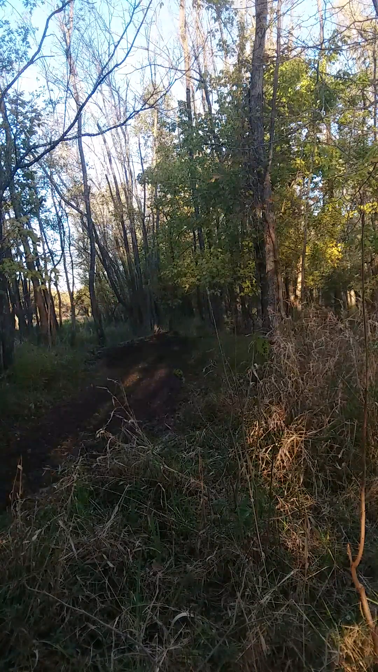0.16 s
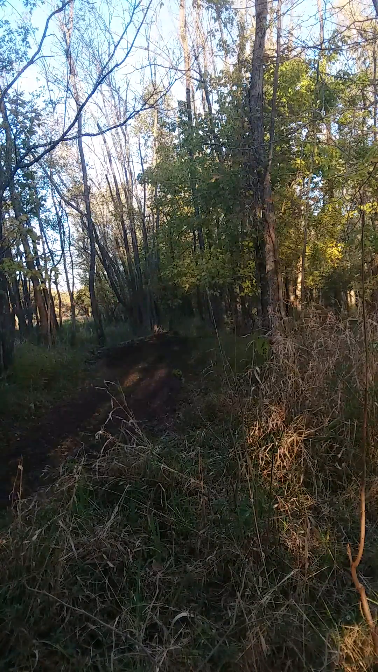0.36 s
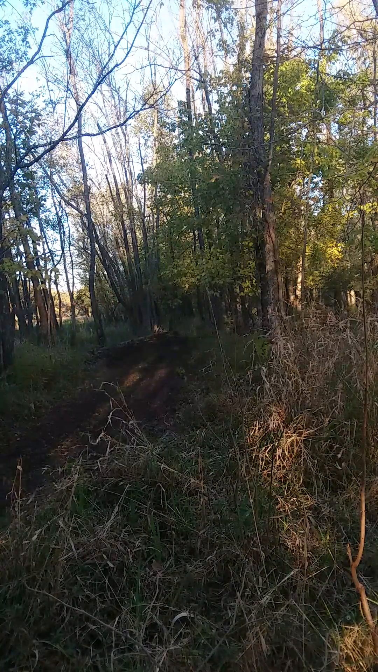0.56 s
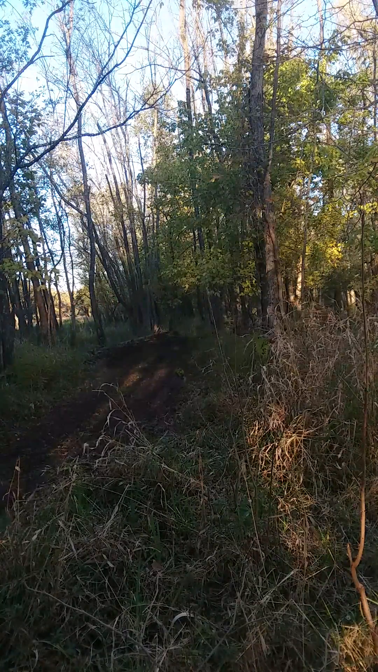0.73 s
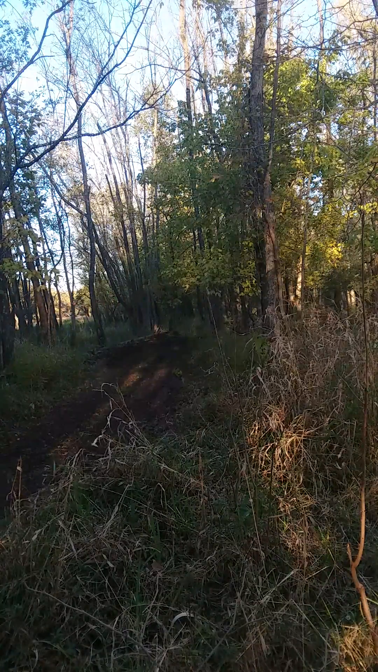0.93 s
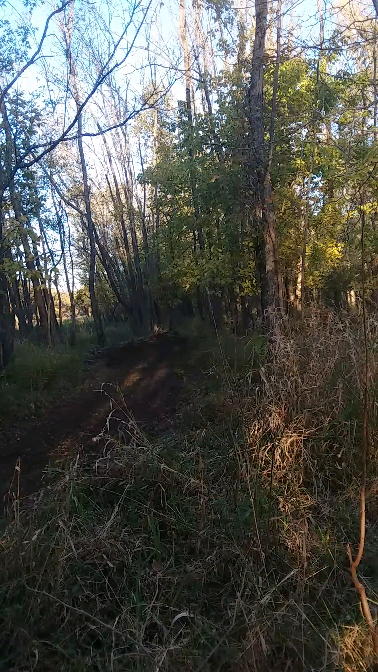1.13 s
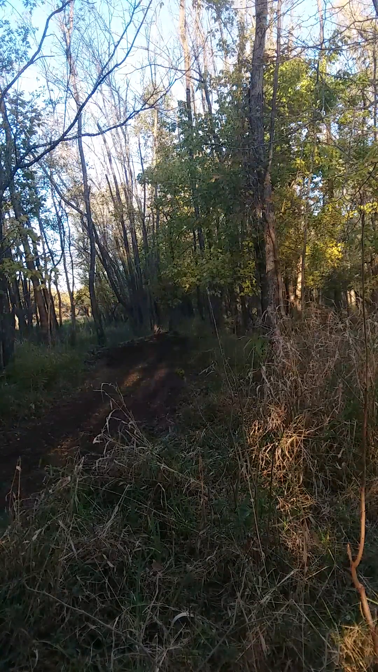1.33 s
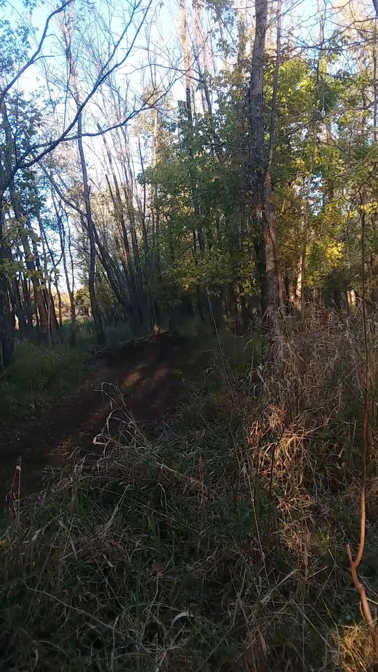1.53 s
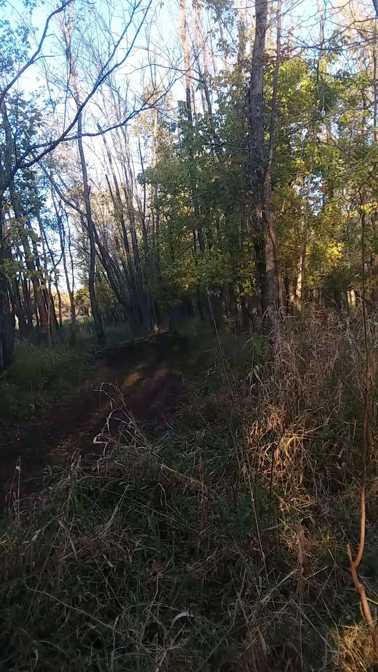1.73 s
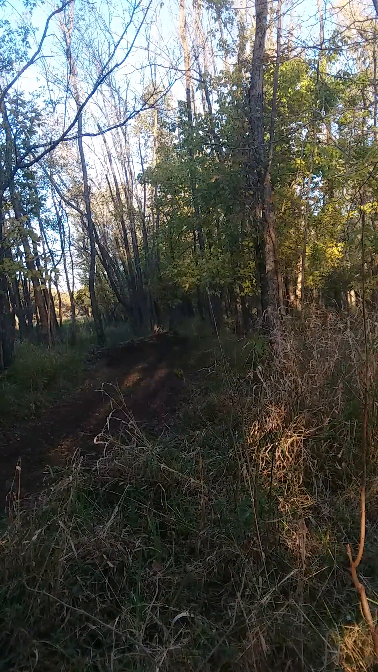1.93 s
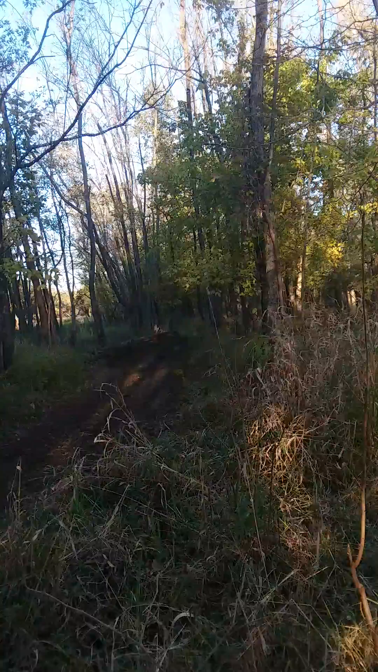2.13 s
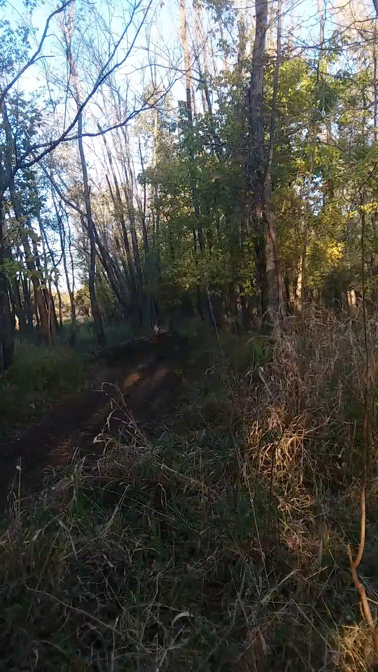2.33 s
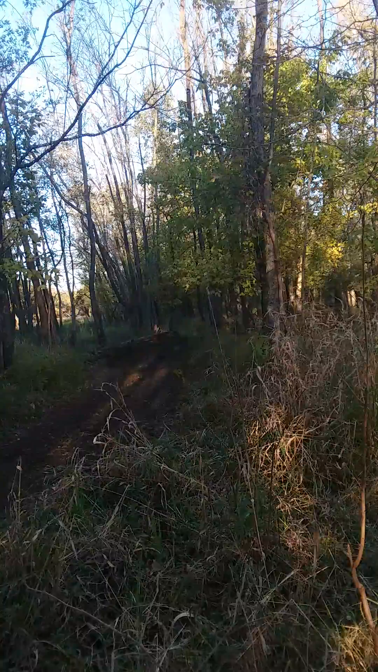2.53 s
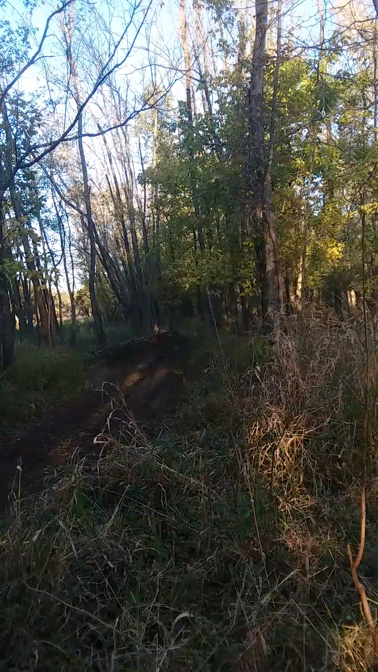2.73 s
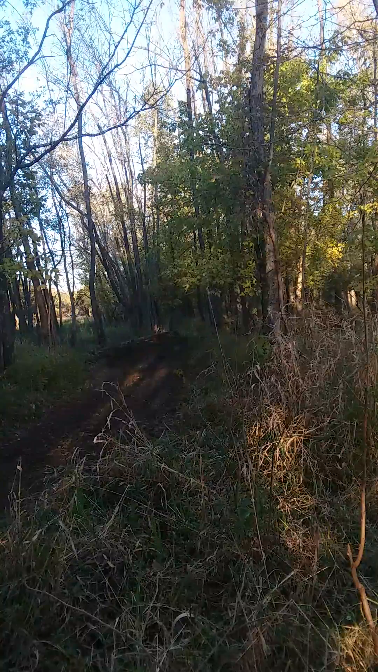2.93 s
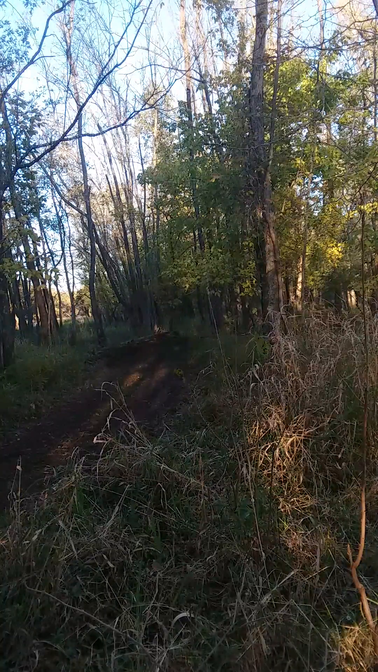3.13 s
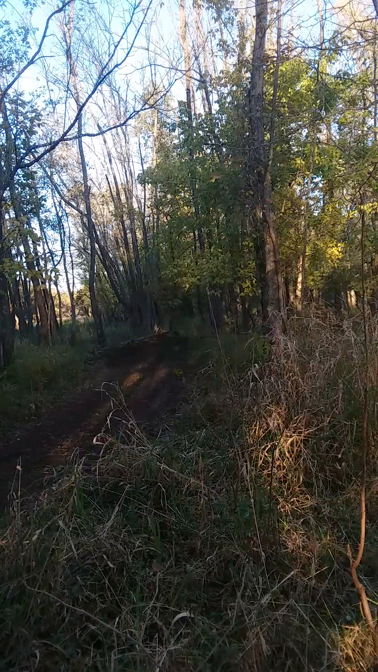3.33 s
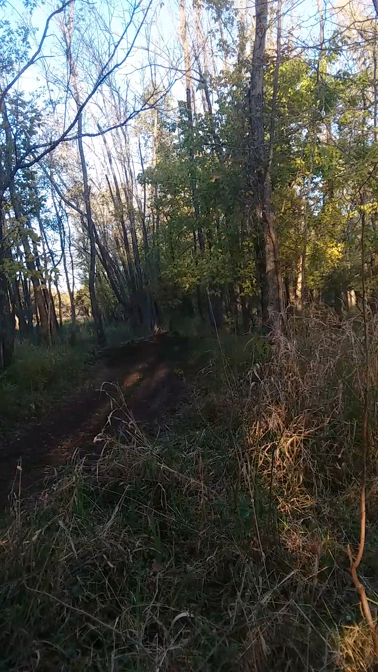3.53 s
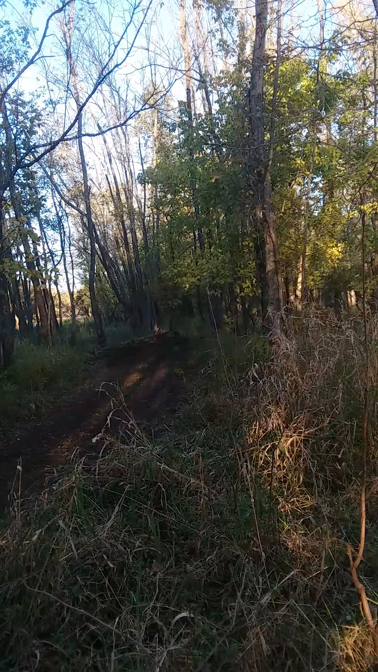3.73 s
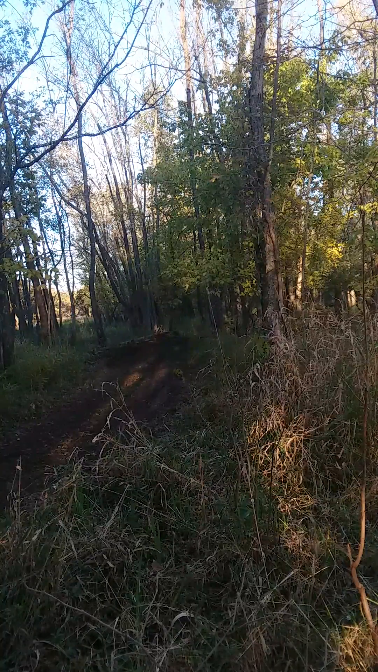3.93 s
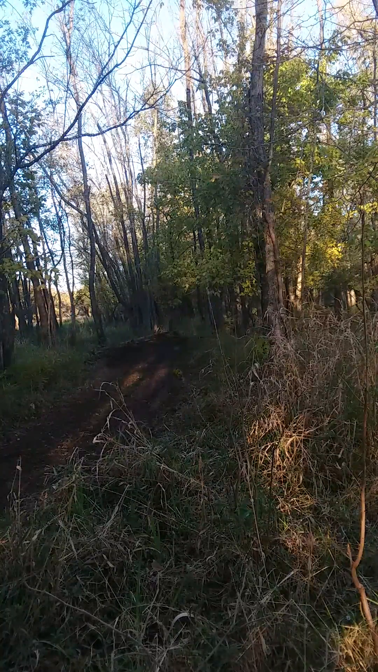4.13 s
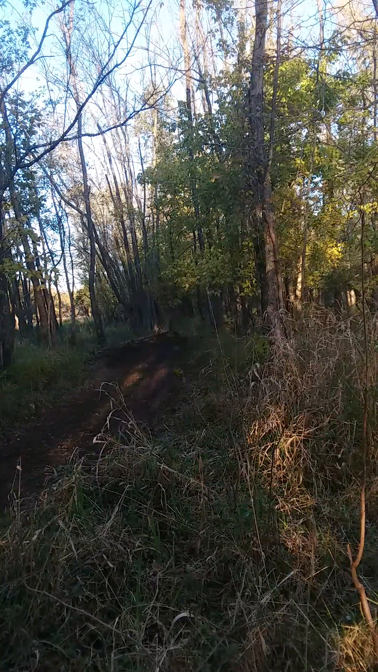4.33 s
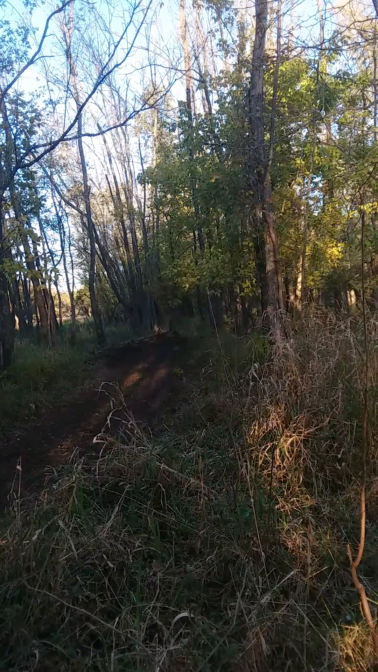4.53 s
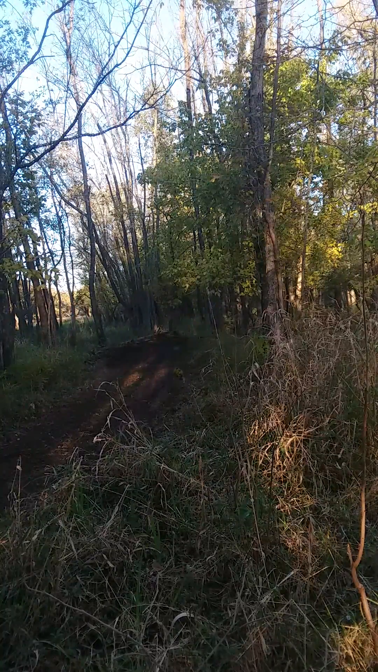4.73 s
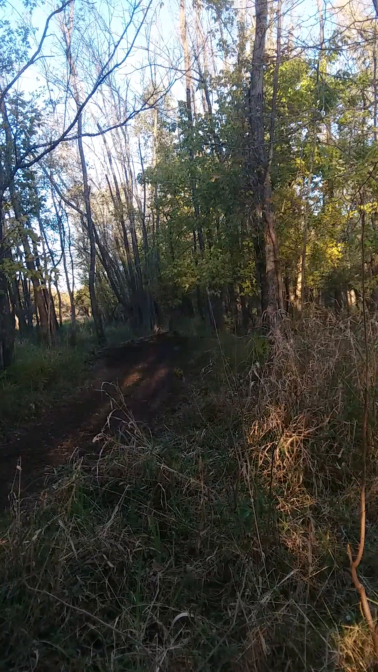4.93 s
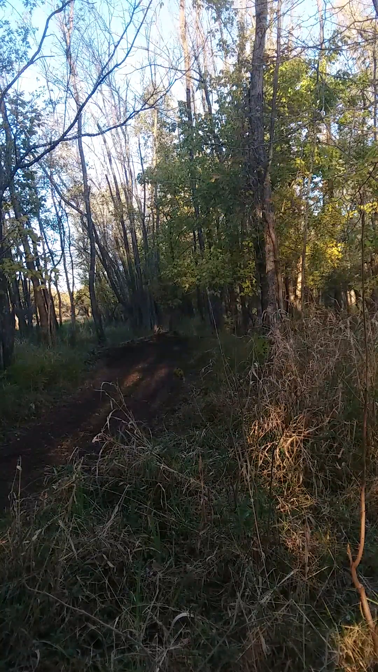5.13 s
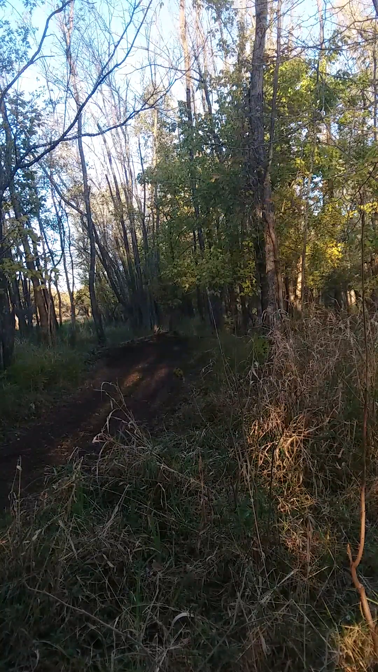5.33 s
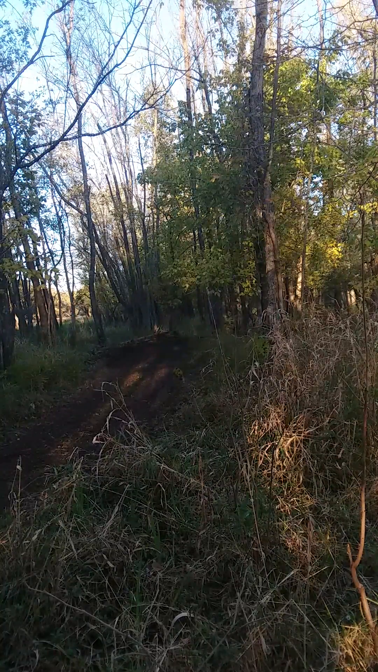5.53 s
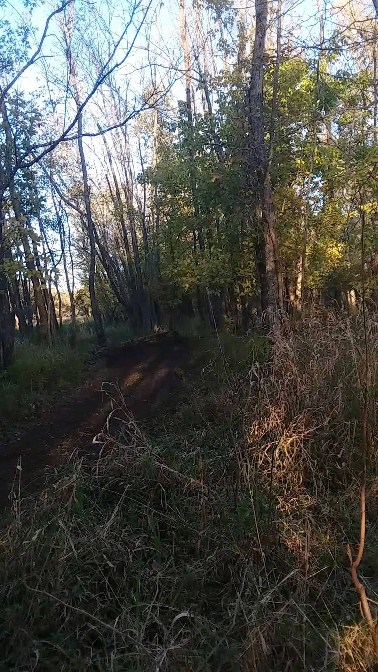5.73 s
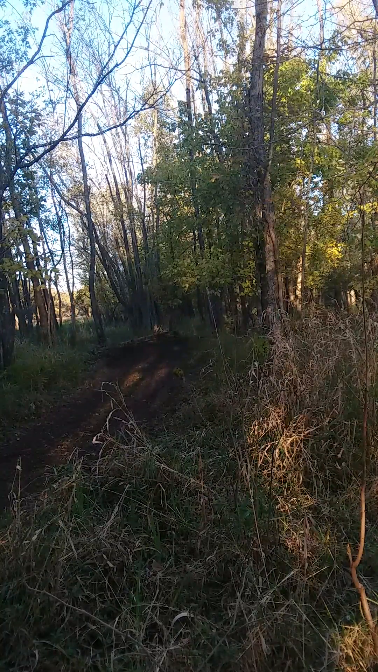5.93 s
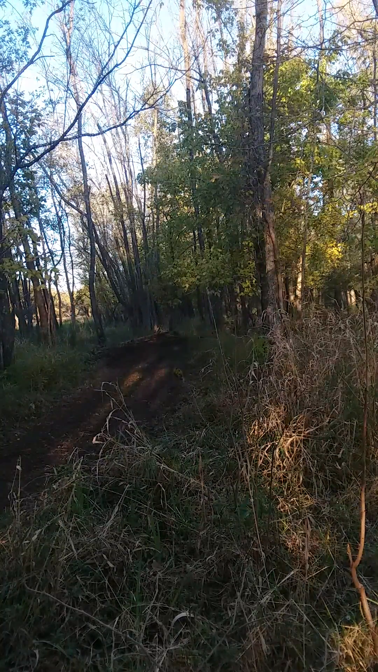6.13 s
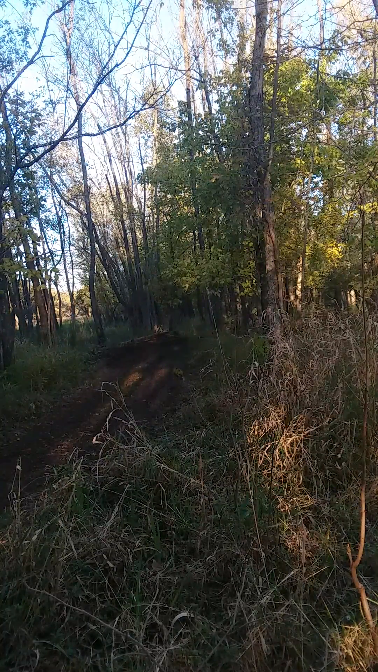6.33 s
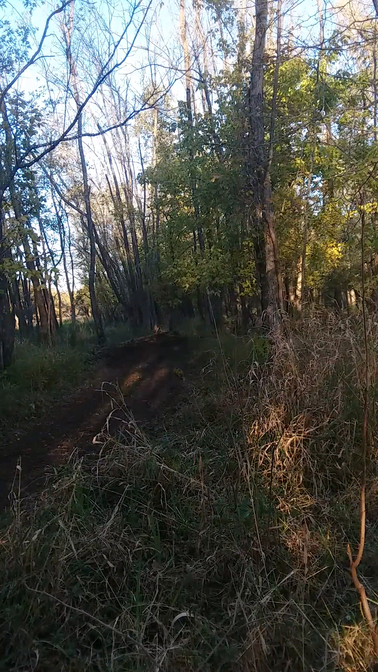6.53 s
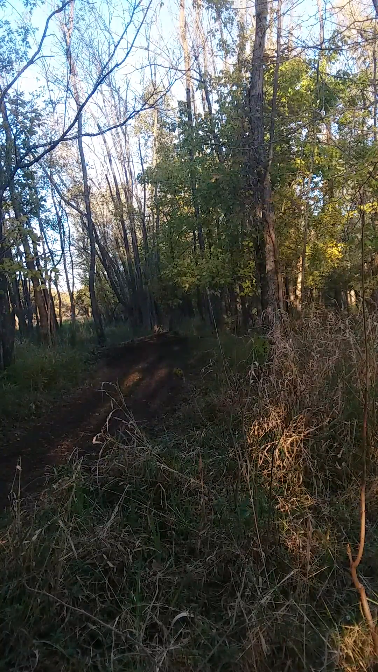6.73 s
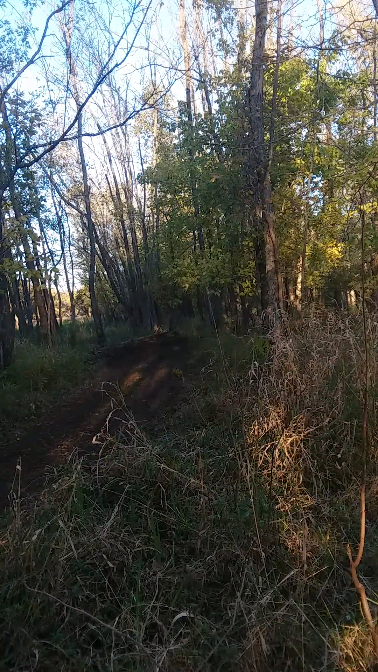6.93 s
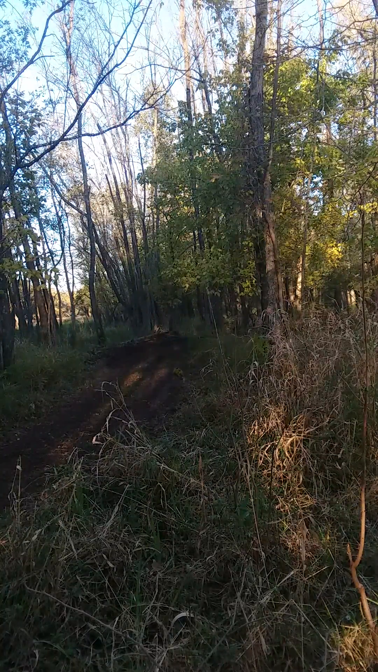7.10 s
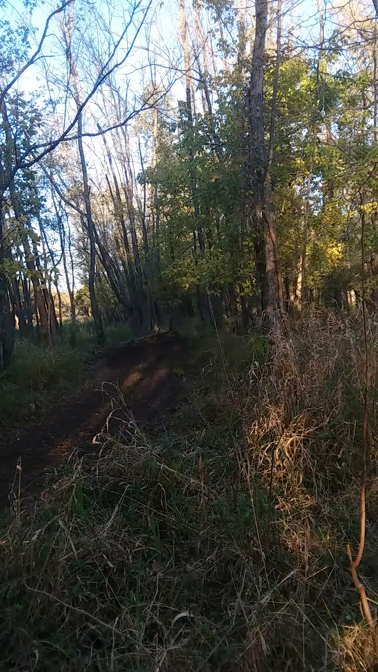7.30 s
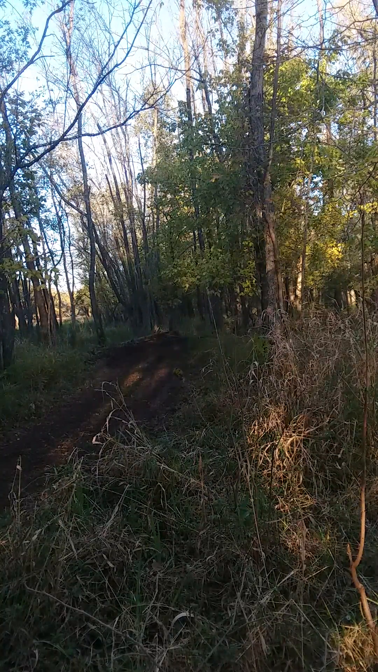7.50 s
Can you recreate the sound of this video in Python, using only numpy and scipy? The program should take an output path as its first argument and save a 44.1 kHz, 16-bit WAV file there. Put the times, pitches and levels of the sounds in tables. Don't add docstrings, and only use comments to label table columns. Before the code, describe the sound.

A small single-cylinder off-road machine starts loud and close, low exhaust thumps with gritty gas and tyre rasp, then drives away along a dirt trail. The throttle opens and closes in short crackling bursts, growing fainter. Later a thin metallic singing and a brief flare come from the exhaust, and a more distant machine blips once. A faint insect trills; trees add a short diffuse echo. Close stereo microphone outdoors, engine slightly right.

```python
import sys
import numpy as np
from scipy import signal
from scipy.io import wavfile
from scipy.ndimage import uniform_filter1d, map_coordinates

SR = 44100
rng = np.random.default_rng(int(sys.argv[2]) if len(sys.argv) > 2 else 0)


def dump(signal):
    limited = np.clip(np.atleast_2d(signal).T, -1, 1)
    pcm = np.round(limited * 32767).astype(np.int16)
    wavfile.write(sys.argv[1], SR, pcm)


def voltage_ratio(decibels):
    exponent = np.asarray(decibels, float) / 20
    return 10 ** exponent


N = 337806
TIME = np.arange(N) / SR
LEAD = SR // 10


def in_time(rows):
    s, *columns = np.transpose(rows)
    return [np.interp(TIME, s, column) for column in columns]


def at_hz(points, hz):
    table_hz, value = np.array(points).T[:2]
    return np.interp(np.log(hz), np.log(table_hz), value)


def rms_one(x):
    return x / np.sqrt(np.mean(x ** 2) + 1e-20)


def drift(rate):
    r = np.exp(-80 * np.pi * rate / SR)
    chance = rng.standard_normal(N // 40 + 2002)
    slow = signal.lfilter([1], [1, -2 * r, r * r], chance)[2000:]
    return np.interp(np.arange(N) / 40, np.arange(len(slow)), rms_one(slow))


def ring(x, hz, t60):
    r, w = voltage_ratio(-60 / (t60 * SR)), 2 * np.pi * hz / SR
    return signal.lfilter([1, -r * np.cos(w)], [1, -2 * r * np.cos(w), r * r], x + 1e-18)


# t/s, speed the engine then heads for [firings per s]
THROTTLE = [(-0.1, 30.16), (0.25, 27.3), (0.7, 34.55), (0.83, 28.02), (1.29, 23.96), (1.59, 27.96),
            (1.79, 18.0), (2.01, 37.28), (2.28, 16.55), (2.48, 27.78), (2.64, 17.53), (3.05, 21.14),
            (3.41, 14.89), (3.92, 27.99), (4.16, 8.63), (4.37, 15.51), (4.75, 29.92), (5.25, 17.1),
            (5.47, 25.73), (5.69, 14.77), (6.17, 31.94), (6.39, 12.64), (6.55, 19.73), (6.72, 35.01),
            (6.93, 24.85), (7.47, 15.8)]


def crank():
    flywheel_s, start_per_s, start_count = .25, 38.84, 1.28
    s, heading = np.transpose(THROTTLE)
    aim = heading[np.searchsorted(s[1:], np.arange(-LEAD, N) / SR)]
    keep = np.exp(-1 / (flywheel_s * SR))
    per_s = signal.lfilter([1 - keep], [1, -keep], aim, zi=[keep * start_per_s])[0]
    turns = start_count + np.cumsum(per_s) / SR
    fired = np.flatnonzero(np.diff(np.floor(turns)))
    return fired - LEAD, per_s[fired]


# t/s, boom level change/dB, crack level change/dB
ODD_FIRINGS = [(0.115, -4, -3), (1.009, -0.5, 12), (1.08, -6.5, -25), (1.18, -2, 2), (1.288, -3, 0),
               (1.323, 4.5, 15.5), (1.586, -5, 17), (2.147, -1.5, 6), (2.311, 0, -4), (2.463, -6, -6),
               (2.504, -1, 8), (2.583, -5, 4), (2.707, 4, 5), (2.795, -1.5, 9), (2.989, 8, -11),
               (3.041, -7, -17), (3.093, 8, 1), (3.244, 0, 13), (3.842, -0.5, 1), (4.202, -2.5, -11),
               (4.253, -0.5, 12), (4.82, 1.5, 8), (4.87, -2, 3), (5.043, 0.5, 2.5), (6.36, -2, -3),
               (6.441, -0.5, -3), (6.64, -3, -13), (7.201, -2, -5.5)]


def odd_firings(fired):
    change = np.zeros((2, len(fired)))
    for s, boom_db, crack_db in ODD_FIRINGS:
        change[:, np.argmin(abs(fired - s * SR))] = boom_db, crack_db
    return change


EASED_CRACK_DB = -15.5
# start t/s, length/s, boom lift level/dB, rasp lift level/dB, crack over rasp level/dB
PULLS = [(0.577, 0.3, -1, 0.5, -0.5), (0.861, 0.09, 3, 5, 3.5), (1.062, 0.15, 4.5, 2, 7.5),
         (1.36, 0.19, 0.5, -2.5, 1), (1.73, 0.2, 1.5, 0, 1), (2.043, .14, 3, 3.5, 11),
         (2.2, .14, -2, 3.5, 7.5), (2.37, 0.08, 3.5, 5, -3), (3.936, .04, 3, 5, 12.5),
         (3.186, 0.25, 4.5, 3, -4), (3.414, 0.4, 3, 4, -10), (4.022, .13, 4.5, 11.5, 11.5),
         (4.752, .1, 5, 2.5, -5), (4.837, .45, 9.5, 12, 7.5), (5.35, 0.31, 10, 6.5, -3),
         (5.692, 0.13, 6.5, 5.5, 7), (6.184, 0.068, 7.5, 10, 6.5), (6.281, 0.11, 11, 12, 17),
         (6.701, 0.072, 7.5, 4, 20.5), (6.786, 0.22, 11, 13.5, 13), (7.019, 0.19, 11.5, 14.5, 8.5),
         (7.204, 0.206, 11, 14, 3.5), (7.45, 0.14, 4.5, 8.5, -16), (7.614, .2, 12, 13.5, -7)]


def pulls():
    attack_s, release_s, crack_release_s = 0.043, 0.14, 0.045
    start, length, boom_db, rasp_db, crack_db = np.transpose(PULLS)[:, :, None]
    rise = (TIME - start) / attack_s + 1
    left = start + length - TIME
    held = np.clip(np.minimum(rise, 1 + left / release_s), 0, 1)
    sharp = np.clip(np.minimum(rise, 1 + left / crack_release_s), 0, 1)
    lifts = held * boom_db, held * rasp_db, sharp * (crack_db - EASED_CRACK_DB)
    return [np.max(lift, axis=0) for lift in lifts]


# f/Hz, signed height, t60/s
PIPE = [(100, .4, .07), (122, -1.24, .034), (132, 1.14, .066), (296, 1.39, .0163), (319, -.66, .034)]
# t/s, pitch factor
RECEDING = [(0, 1.0), (.5, .93), (.8, .9), (.9, 1.16), (1.0, .92), (1.18, 1.14), (1.35, .97), (1.6, .95),
            (2.8, .91), (3.3, 1.0), (7.66, 1.0)]


def boom(fired, per_s, level_db, upper_db, uneven_db):
    echo_s, puff_hz, early_s = .0087, 245, .0015
    idle_full = [17, 25]
    size = SR // 8
    out, t = np.zeros(LEAD + N + size), np.arange(size) / SR
    hz, height, t60 = np.transpose(PIPE)[:, :, None]
    tune = np.interp(per_s, idle_full, [.88, 1])
    tune *= np.interp(fired / SR, *np.transpose(RECEDING))
    tune *= 1 + .018 * rng.standard_normal(len(fired))
    echo_db = np.interp(per_s, idle_full, [3.5, -4.5])
    chance = uneven_db * rng.standard_normal((len(fired), 3))
    for k, at in enumerate(np.maximum(fired + LEAD - round(early_s * SR), 0)):
        gain = height * voltage_ratio((upper_db[k] + chance[k, 2]) * (hz > 180))
        modes = gain * voltage_ratio(-60 * t / t60) * np.cos(2 * np.pi * hz * tune[k] * t)
        puff = -np.sum(modes, axis=0)
        lag = round(echo_s / tune[k] * SR)
        puff[lag:] += voltage_ratio(echo_db[k] + chance[k, 0]) * puff[:-lag]
        energy = np.sum(puff ** 2) * per_s[k] / SR
        out[at:at + size] += voltage_ratio(level_db[k] + chance[k, 1]) * puff / np.sqrt(energy)
    out = signal.sosfilt(signal.butter(4, puff_hz, fs=SR, output="sos"), out)
    return signal.sosfilt(signal.butter(2, 50, "high", fs=SR, output="sos"), out)[:LEAD + N]


def cracks(fired, level_db, centre_hz, decay_s, width_hz, wide_db):
    shock, dip_db = 5, -4
    size = 500
    out, shape = np.zeros(N + size), np.arange(size) / SR / decay_s
    shape = shape * np.exp(-shape)
    r = np.exp(-np.pi * width_hz / SR)
    chance = rng.standard_normal((len(fired), 2))
    noise = rng.standard_normal((len(fired), size)) * shape
    noise[:, 8] -= shock
    for k in np.flatnonzero(fired >= 0):
        w = 2 * np.pi * centre_hz[k] * (1 + 0.06 * chance[k, 0]) / SR
        poles = [1, -2 * r * np.cos(w), r * r]
        burst = rms_one(signal.lfilter([1, 0, -1], np.convolve(poles, poles), noise[k]))
        burst += voltage_ratio(wide_db[k]) * rms_one(noise[k])
        burst -= voltage_ratio(dip_db) * rms_one(shape)
        out[fired[k]:fired[k] + size] += voltage_ratio(level_db[k] + 1.5 * chance[k, 1]) * burst
    return out[:N]


def gate(fired, depth_db, decay_s):
    jumps = np.zeros(N)
    jumps[np.maximum(fired, 0)] = voltage_ratio(2 * depth_db)
    power = 1 + signal.lfilter([1], [1, -np.exp(-1 / (decay_s * SR))], jumps)
    return np.sqrt(power / uniform_filter1d(power, SR // 10))


# f/Hz, left-right likeness [0-1]
LIKENESS = [(100, 1), (500, 1), (1000, 0.92), (2000, 0.68), (4000, 0.05), (10000, 0.39)]
# f/Hz, left minus right level/dB
LEAN = [(60, 0.0), (110, 0.0), (200, 8.5), (380, -2.5), (700, 1.5), (1290, 1.0), (2380, 3), (4400, 0.5),
        (8120, -0.5), (15000, -2)]


def banded_noise(spectrum, patchy_db, count):
    edges = np.geomspace(spectrum[0][0], min(spectrum[-1][0], .4 * SR), count + 1)
    out, white = 0, rng.standard_normal((2, 2, N))
    for k, (low, high) in enumerate(zip(edges, edges[1:])):
        band = signal.butter(2, [low, high], "band", fs=SR, output="sos")
        mid, side = signal.sosfilt(band, white[k % 2])
        hz = np.sqrt(low * high)
        alike = np.clip(at_hz(LIKENESS, hz), 0, 1)
        gain = voltage_ratio(at_hz(spectrum, hz) + patchy_db * drift(8.5))
        gain = gain * voltage_ratio(at_hz(LEAN, hz) / 2 * np.array([[1], [-1]]))
        out = out + gain * (np.sqrt(1 + alike) * mid + np.sqrt(1 - alike) * side * [[1], [-1]])
    return rms_one(out)


# f/Hz, level/dB per Hz
RASP_NEAR = [(190, -40), (330, 0.5), (493, -15), (726, -9), (1060, -12.5), (1190, -7), (1300, -13.5),
             (1850, -15.5), (6000, -34.5), (7800, -64), (13200, -120)]
# f/Hz, level/dB per Hz
RASP_FAR = [(190, -24), (330, -2), (452, -4), (684, -10), (1150, -7), (1350, -3.5), (1680, -1.5),
            (2110, -10), (3150, -8), (3650, -12), (4540, -24), (6000, -62), (7800, -58), (13200, -120)]
# t/s, share of the far colour [0-1]
FARNESS = [(0, 0.05), (1.3, 0.24), (2.0, 0.42), (2.9, 0.76), (7.66, 0.97)]


def rasp_noise():
    far = np.clip(in_time(FARNESS)[0], 0, 1)
    near_noise = banded_noise(RASP_NEAR, patchy_db=-1.9, count=12)
    far_noise = banded_noise(RASP_FAR, patchy_db=.9, count=12) + whine()
    return np.sqrt(1 - far) * near_noise + np.sqrt(far) * far_noise


# f/Hz, level/dB per Hz
TOP_HISS = [(2940, -30), (5000, 0), (6260, -2), (8100, -2), (8490, -3), (9620, -12), (11400, -9),
            (13800, -9), (15600, -15)]


def top_hiss():
    return banded_noise(TOP_HISS, patchy_db=2.0, count=18)


# f/Hz, level/dB, t60/s
RUMBLE_MODES = [(72, -7, .08), (110, 0, .1), (185, -3, .05)]


def rumble():
    shake = rng.standard_normal(N) * voltage_ratio(4.6 * drift(3.3))
    modes = 0
    for hz, db, t60 in RUMBLE_MODES:
        modes = modes + voltage_ratio(db) * rms_one(ring(ring(shake, hz, t60), hz, t60 / 3))
    return rms_one(signal.sosfilt(signal.butter(4, 48, "high", fs=SR, output="sos"), modes))


def insect():
    hz, level_db = 3260, -61
    tone = ring(ring(rng.standard_normal(N), hz, 0.017), hz, 0.0084)
    throb = np.clip(np.sin(2 * np.pi * 21 * TIME + 0.56 * drift(4.7)), 0, 1)
    return voltage_ratio(level_db + 3.0 * drift(0.17)) * rms_one(tone) * throb


def trees(x, t60, cut_hz, alike):
    t = np.arange(SR // 2) / SR
    mid, side = rng.standard_normal((2, len(t))) * voltage_ratio(-60 * t / t60) * np.clip(t / 0.018, 0, 1)
    sides = [mid + (1 - alike) * side, mid - (1 - alike) * side]
    both = signal.lfilter(*signal.butter(1, cut_hz, fs=SR), sides)
    both = both / np.sqrt(np.sum(both ** 2, axis=1, keepdims=True))
    return signal.fftconvolve(x[None], both, axes=1)[:, :len(x)]


# t/s, lag [samples]
LEFT_LAG = [(0, 5.55), (1.7, 3.3), (3, 1.44), (7.66, 2.4)]


def two_ports(left, right):
    lag, = in_time(LEFT_LAG)
    left = map_coordinates(left, [np.arange(N) - lag], order=3, mode="nearest")
    return np.array([left * voltage_ratio(-.1), right])


def whine():
    hz, level_db = 1660, -13
    sing_s, sing_half_s, sing_db = 4.29, .13, 11
    swell_db = sing_db * np.exp(-((TIME - sing_s) / sing_half_s) ** 4)
    return voltage_ratio(level_db + swell_db + 1.8 * drift(1.2)) * rms_one(ring(rng.standard_normal(N), hz, 0.05))


# t/s, half length/s, level/dB
AFTERBURN = [
    (4.871, 0.024, -37),
]


def afterburn():
    swell = sum(voltage_ratio(db) * np.exp(-((TIME - s) / half) ** 2) for s, half, db in AFTERBURN)
    band = signal.butter(1, [250, 2500], "band", fs=SR, output="sos")
    noise = signal.sosfilt(band, rng.standard_normal(N))
    return swell * voltage_ratio(4.0 * drift(170)) * rms_one(noise)


# t/s, level/dB
OTHER = [
    (5.5, -78),
    (5.62, -47),
    (5.9, -40),
    (6.05, -36),
    (6.13, -39),
    (6.24, -70),
]


def second_machine():
    start_s, firings, top_per_s = 5.6155, 13, 25
    run_up_s, behind = .0955, .635
    t = np.clip(TIME - start_s, 0, None)
    count = top_per_s * t - behind * (1 - np.exp(-t / run_up_s))
    fired = np.searchsorted(count, np.arange(firings) + 1e-6)
    return fired, np.gradient(count)[fired + 1] * SR, in_time(OTHER)[0]


# t/s, boom level/dB, rasp level/dB
RIDE = [(0, -11.5, -25), (.5, -8.5, -26.5), (1.22, -14, -29.5), (1.4, -16, -31), (1.9, -20.5, -36),
        (2.65, -20.5, -36), (2.9, -29.5, -44.5), (3.7, -28.5, -53.5), (4.3, -26.5, -48.5),
        (4.6, -28.5, -50), (6.2, -29, -52), (6.63, -29, -52), (7.66, -30.5, -50.5)]
# t/s, crack centre f/Hz, upper pipe modes level/dB,
# top hiss over rasp level/dB
FACING = [(0, 1410, -15.5, -18), (.45, 1360, 0, -16.5), (.72, 1310, -10.5, -16), (.92, 1470, -6, -15),
          (1.15, 1160, 2.5, -16), (1.55, 1400, -24, -16.5), (1.95, 1500, -15, -16.5),
          (2.16, 2810, -9.5, -12.5), (2.42, 2360, -3.5, -13), (2.85, 1600, -23, -17),
          (3.2, 1510, -5, -19.5), (4.1, 2060, -11, -11), (4.4, 1620, -10.5, -15.5), (5.05, 2260, -4.5, -15),
          (5.7, 1560, -12, -16.5), (6.35, 1430, -9, -18), (6.9, 1770, -8.5, -15), (7.66, 1500, -9.5, -16.5)]


def scene():
    coast_db, coast_rasp_db = in_time(RIDE)
    centre_hz, bark_db, top_db = in_time(FACING)
    boom_lift, rasp_lift, crack_lift = pulls()
    boom_db, rasp_db = coast_db + boom_lift, coast_rasp_db + rasp_lift
    fired, per_s = crank()
    other, other_per_s, other_db = second_machine()
    at = np.maximum(fired, 0)
    boom_change, crack_change = odd_firings(fired)
    shock_db = EASED_CRACK_DB + crack_lift[at] + crack_change

    low = boom(fired, per_s, boom_db[at] + boom_change - 2.5, bark_db[at] + 8, uneven_db=1.4)
    low += boom(other, other_per_s, other_db[other] + 4, bark_db[other], uneven_db=2.0)
    low = (low + voltage_ratio(-24) * trees(low, t60=.3, cut_hz=600, alike=.85))[:, LEAD:]

    sharp = cracks(fired, rasp_db[at] + shock_db - 7.0, centre_hz[at],
                   decay_s=0.001, width_hz=1120, wide_db=top_db[at] - 6)
    sharp += afterburn()
    sharp = sharp + voltage_ratio(-11.0) * trees(sharp, t60=0.049, cut_hz=11000, alike=0.082)

    other_beat = gate(other, 14, decay_s=0.0032)
    rasp_level = voltage_ratio(rasp_db) * gate(fired, .5 * shock_db + 7.5, decay_s=0.0084)
    rasp = np.hypot(rasp_level, voltage_ratio(other_db) * np.sqrt(other_beat)) * rasp_noise()
    top_level = voltage_ratio(rasp_db + top_db) * gate(fired, 0.25 * shock_db + 8.5, decay_s=0.0035)
    top = np.hypot(top_level, voltage_ratio(other_db - 13) * other_beat) * top_hiss()

    ground = voltage_ratio(coast_db - 14 + .5 * boom_lift) * rumble()
    left, right = low + ground + sharp + rasp + top + insect()
    return two_ports(left, right)


def top_cut(x):
    return signal.sosfilt(signal.butter(12, 15800, fs=SR, output="sos"), x)


def record(dry):
    cut = signal.sosfilt(signal.butter(2, 30, "high", fs=SR, output="sos"), dry)
    cut = signal.sosfilt(signal.cheby2(12, 60, 16100, fs=SR, output="sos"), cut)
    return top_cut(cut)


dry = scene()
out = record(dry)
dump(out)
```